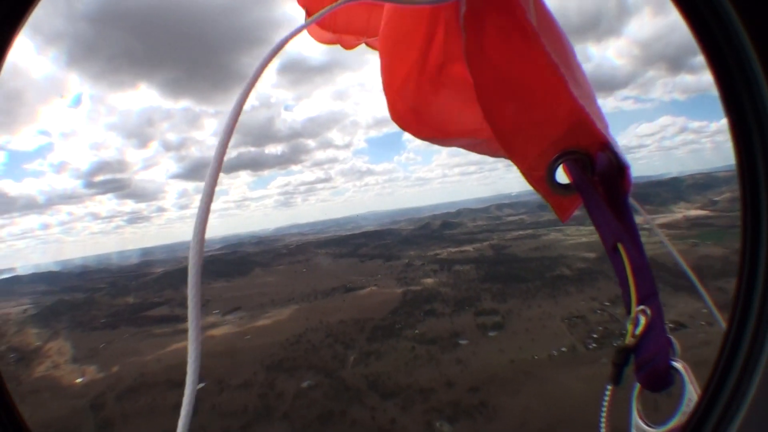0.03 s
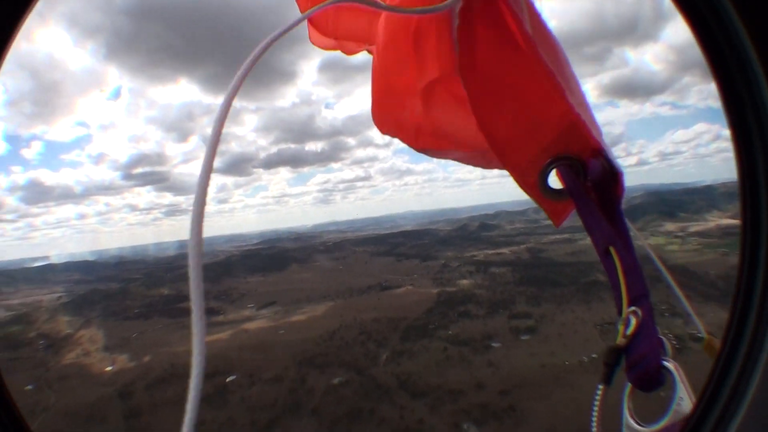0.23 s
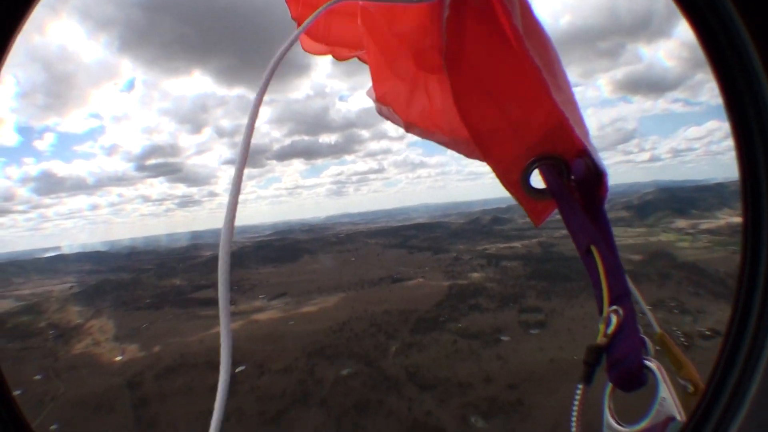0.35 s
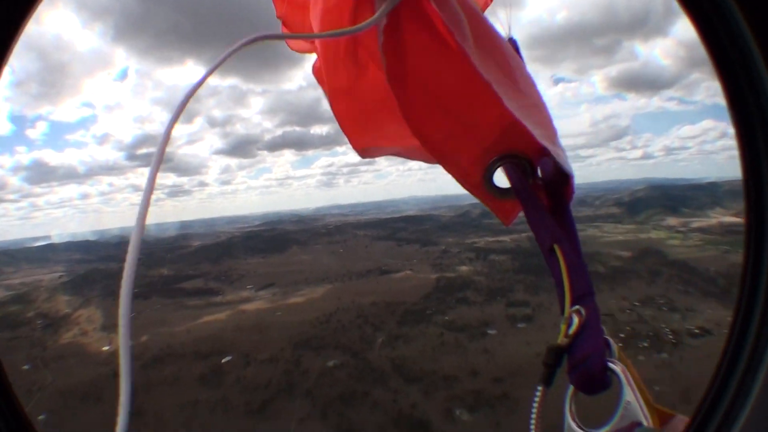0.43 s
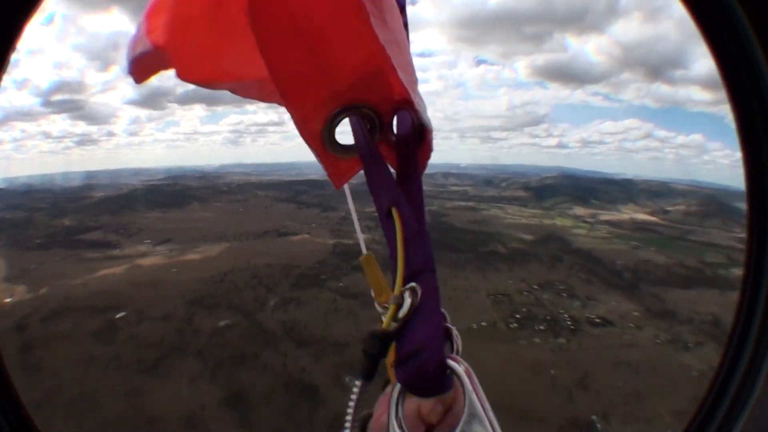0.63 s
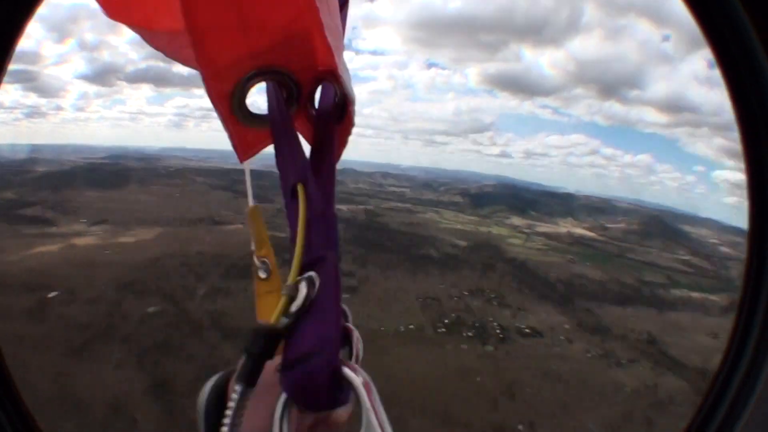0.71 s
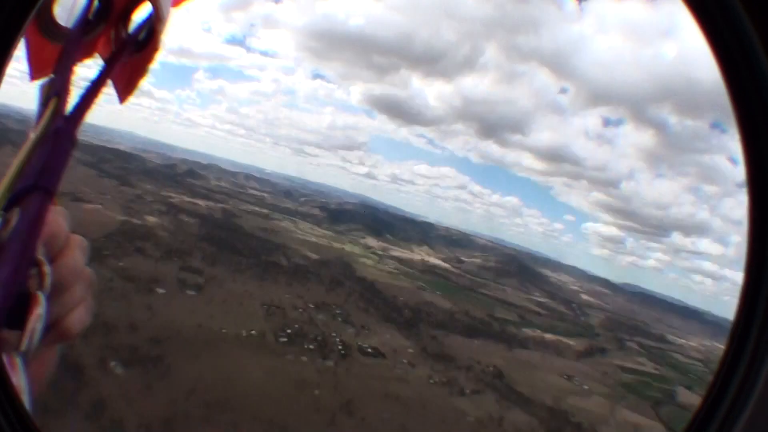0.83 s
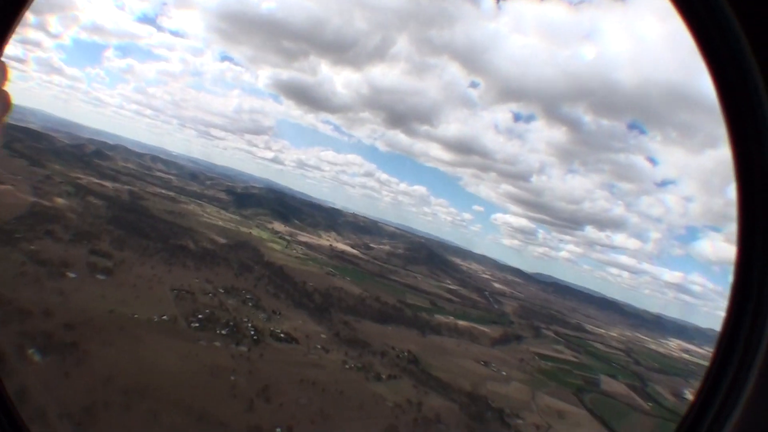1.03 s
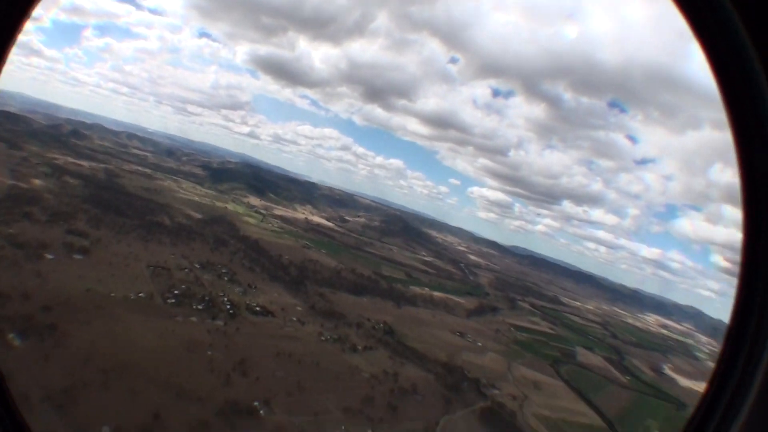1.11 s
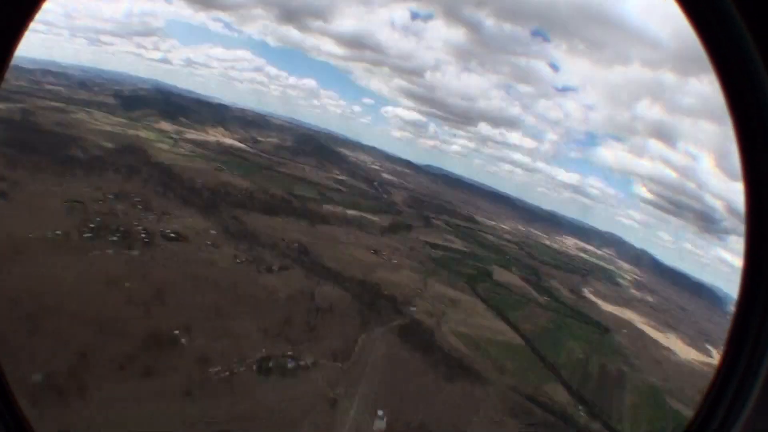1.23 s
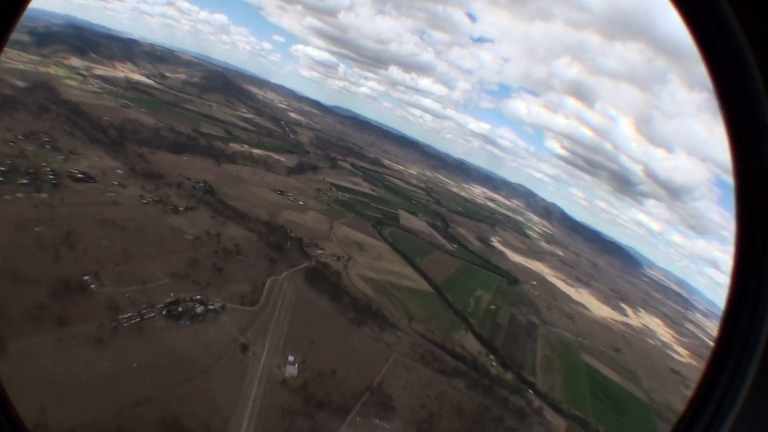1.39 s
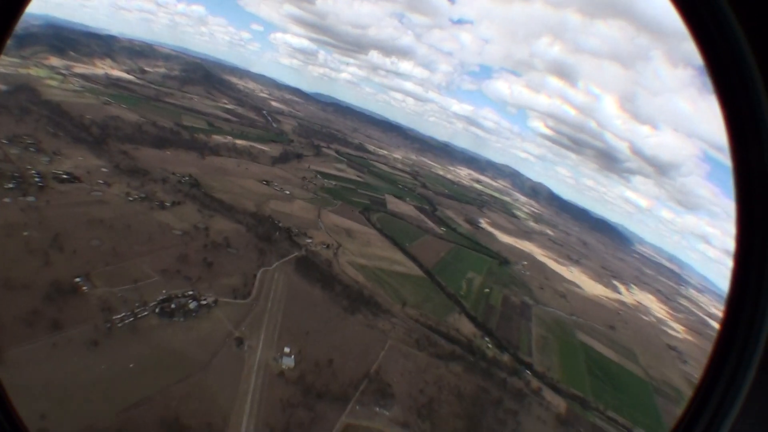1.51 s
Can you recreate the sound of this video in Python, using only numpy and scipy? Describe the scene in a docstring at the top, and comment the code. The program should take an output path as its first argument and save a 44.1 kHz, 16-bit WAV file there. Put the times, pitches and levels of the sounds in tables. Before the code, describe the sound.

Rushing wind buffets a microphone worn under an open parachute. Low rumble, fabric crackles and small line snaps come first, then a loud hissing blast that dies away with a whistle sinking in pitch.

```python
"""A blast of wind hits a camera worn by a skydiver under an open canopy (the parachute).
As the camera turns into the airstream, eddies (swirls of air) buffet its two microphone
openings, the ports. The blast brightens into a roar and hiss, then dies away, leaving a
falling, airy whistle of air passing over an edge. Behind it, air rumbles around the body,
the cloth rustles and pops, and the rigging lines snap."""
import sys
import numpy as np
from scipy import signal
from scipy.fft import rfft, irfft
from scipy.io import wavfile

SR = 44100
rng = np.random.default_rng(int(sys.argv[2]) if len(sys.argv) > 2 else 0)


def dump(signal):
    """Clip the signal to [-1, 1] and save it as 16-bit WAV at the path in sys.argv[1]."""
    limited = np.clip(np.atleast_2d(signal).T, -1, 1)
    pcm = np.round(limited * 32767).astype(np.int16)
    wavfile.write(sys.argv[1], SR, pcm)


N = 68355
TIME = np.arange(N) / SR
HZ = np.fft.rfftfreq(N, 1 / SR)

# How alike the two ports sound (1 is fully alike): frequency_hz, likeness
PORT_LIKENESS = [(100, 0.54), (280, 0.61), (550, 0.38), (1000, 0.25), (1700, 0.32), (3000, 0.18),
                 (6000, 0.78), (10000, 0.68), (14000, .99)]
# The same for the high hiss: frequency_hz, likeness
HISS_LIKENESS = [(3000, 1), (7000, .93), (11000, 0.84), (14000, 0.95)]
# How far the wave at the right port runs ahead of the left: frequency_hz, lead_radians
PORT_LEAD = [(300, -1), (600, 1.23), (1100, 3), (2100, 4), (3500, 2), (6000, 1.43), (10000, 0.68),
             (15000, -0.3)]


def amp(db):
    """Turns decibels into a multiplier."""
    return 10 ** (np.asarray(db) / 20)


def unit_power(x):
    """Scales a signal to an average power of one."""
    return x / np.sqrt(np.mean(x ** 2) + 1e-20)


def over_frequency(points, hz=HZ):
    """Joins a table's points along a logarithmic frequency axis."""
    frequency, value = np.transpose(points)
    return np.interp(np.log(hz + 1), np.log(frequency), value)


def over_time(points, column=1):
    """Joins the points of one table column along time."""
    rows = np.array(points)
    return np.interp(TIME, rows[:, 0], rows[:, column])


def wander(rate_hz):
    """Random drift, up to about the given rate."""
    noise = rfft(rng.standard_normal(N))
    return unit_power(irfft(noise * HZ / (HZ + 8) / (1 + (HZ / rate_hz) ** 4), N))


def churn(depth_db, rate_hz):
    """Loudness that swells and sinks as eddies pass."""
    return unit_power(amp(depth_db * np.clip(wander(rate_hz), -2, 2)))


def air_noise(spectrum, likeness, lead=0):
    """The noise of swirling air, partly shared by the two ports."""
    left, separate = rfft(rng.standard_normal((2, N)))
    right = (likeness * left + np.sqrt(1 - likeness ** 2) * separate) * np.exp(1j * lead)
    return unit_power(irfft(np.array([left, right]) * amp(over_frequency(spectrum)), N))


def colour(x, spectrum):
    """Shapes the tone with a filter that never rings early, so clicks stay sharp."""
    log_gain = np.log(amp(over_frequency(spectrum, abs(np.fft.fftfreq(2048, 1 / SR)))))
    taps = np.fft.ifft(np.exp(np.conj(signal.hilbert(log_gain)))).real
    return signal.fftconvolve(x, taps / np.linalg.norm(taps))[:N]


def pops(rows, spectrum, first_slip=1.1):
    """Each pop is one sharp slip and a burst of tiny ones that dies within milliseconds."""
    out = np.zeros(N)
    for start_s, level_db, decay_s in rows:
        age = (np.arange(N) - round(start_s * SR)) / SR
        tiny_slips = rng.standard_normal(N) * (age >= 0) * np.exp(-abs(age) / decay_s)
        burst = colour(tiny_slips + first_slip * (age == 0), spectrum)
        strength = np.sqrt(np.sum(burst ** 2) / (decay_s * SR))
        out += amp(level_db) * burst / strength / np.pi
    return out


def ringing(pitch_hz, width_hz):
    """A resonance stirred by swirling air; the real part of the result is the sound."""
    stir = rng.standard_normal(N) + 1j * rng.standard_normal(N)
    for _ in range(3):  # each pass through a filter width_hz wide narrows the band further
        stir = signal.lfilter([1], [1, -np.exp(-np.pi * width_hz / SR)], stir)
    return stir / np.std(stir) * np.exp(2j * np.pi * np.cumsum(pitch_hz) / SR)


def faint_air(level_db=-69):
    """A faint, steady, very high hiss of air."""
    # Its tone: frequency_hz, gain_db
    spectrum = [(3000, -22), (9000, -4), (13000, 20), (16000, -12)]
    return amp(level_db) * air_noise(spectrum, over_frequency(HISS_LIKENESS))


def rumble():
    """Air flowing around the body rumbles."""
    # Loudness of the flow: time_s, level_db
    levels = [(0, -33.5), (.18, -29.5), (.24, -28), (.35, -27.5), (.46, -27), (.55, -18.5), (.66, -30),
              (.77, -30), (1.07, -25.5), (1.22, -38.5), (1.55, -37)]
    # Its deep tone: frequency_hz, gain_db
    spectrum = [(15, -26), (35, -11.5), (70, -3), (130, -2.5), (230, -7.5), (400, -18), (900, -22.5),
                (2500, -52)]
    # How alike left and right are: frequency_hz, likeness
    likeness = [(50, 1), (250, 0.6)]
    return air_noise(spectrum, over_frequency(likeness)) * amp(over_time(levels))


def rustle(crackles_per_s=420, crackle_db=-7, spread_db=4.0):
    """The canopy cloth flutters with a fine crackle."""
    # Loudness of the cloth: time_s, level_db
    levels = [(0, -42.5), (.2, -43), (.235, -38.5), (.28, -42), (.37, -40.5), (.44, -37), (.51, -38),
              (.6, -30), (1.2, -46.5), (1.55, -41.5)]
    # Its tone: frequency_hz, gain_db
    spectrum = [(600, -6), (2000, -3), (2900, -1.5), (4500, -3), (7500, -9), (10000, -17), (13000, -29),
                (16000, -33)]
    # How alike left and right are: frequency_hz, likeness
    likeness = [(1500, 0.92), (3000, .93), (7000, 0.54), (11000, .92), (14000, .995)]
    sizes = amp(spread_db * np.minimum(rng.exponential(1, N), 3)) * rng.choice([-1, 1], N)
    clicks = sizes * (rng.random(N) < crackles_per_s / SR)
    crackle = unit_power(colour(clicks, spectrum))
    flutter = air_noise(spectrum, over_frequency(likeness)) * churn(depth_db=1.1, rate_hz=45)
    return (flutter + amp(crackle_db) * crackle) * amp(over_time(levels))


def creases():
    """Creases pop in the cloth."""
    # Each pop: start_s, level_db, decay_s
    events = [(.153, -28, .004), (.186, -36, 0.00092), (.2338, -20, .0012), (.2475, -32, 0.0017),
              (.3245, -18.5, 0.001), (.3785, -19.5, 0.0012), (.399, -25, 0.0067), (.4325, -20.5, .003),
              (.4555, -18, 0.0017), (.4605, -13, 0.0015), (.481, -24, 0.0062), (.4965, -34, .002),
              (.516, -18, 0.0011), (.5455, -18, .003), (.608, -11.5, 0.0027), (.621, -10.5, 0.0028)]
    # Their crisp tone: frequency_hz, gain_db
    spectrum = [(600, -7), (2000, -6), (2900, 6), (4500, 4), (7500, -2.5), (10000, -7), (13000, -14),
                (16000, -34)]
    return pops(events, spectrum)


def snaps():
    """The rigging lines snap sharply."""
    # Each snap: start_s, level_db, decay_s
    events = [(.0977, -15.5, 0.0011), (.1407, -17.5, 0.0024), (.1428, -16.5, 0.0012)]
    # Their bright tone: frequency_hz, gain_db
    spectrum = [(800, -36), (2300, -6), (3300, -4.5), (6500, 0), (10000, -5.5), (13500, -14), (16000, -29)]
    return pops(events, spectrum, first_slip=3)


def tick():
    """One thin, high tick near the end."""
    # The tick: start_s, level_db, decay_s
    events = [(1.4442, -33, .0006)]
    # Its tone: frequency_hz, gain_db
    spectrum = [(3000, -25), (9000, -6), (12000, -9), (14500, 0), (16000, -3)]
    return pops(events, spectrum)


def canopy(right_db=1.8):
    """The parachute's sounds overhead, a little louder on the right."""
    return (rustle() + creases() + snaps() + tick()) * amp([[-right_db / 2], [right_db / 2]])


def puffs():
    """Stray eddies swell and pass, pushing the two ports against each other."""
    # Each puff: middle_s, half_length_s, level_db
    events = [(0.022, 0.0079, -26.5), (0.234, .035, -31), (0.346, 0.011, -34), (0.426, 0.0089, -25),
              (0.588, 0.028, -16.5), (0.857, 0.0099, -21.5)]
    # Their hollow tone: frequency_hz, gain_db
    spectrum = [(70, -8), (180, 1), (400, 7.5), (600, 2.5), (1000, -8.5), (1700, -13), (4000, -54)]
    swells = sum(amp(db) * np.exp(-((TIME - middle) / half) ** 2 / 2) for middle, half, db in events)
    return air_noise(spectrum, likeness=0.83, lead=2.26) * swells


def boom():
    """Large eddies pump both ports together in a low throb."""
    # The boom of the camera housing: time_s, pitch_hz, level_db
    path = [(.48, 130, -63), (.56, 149.9, -27), (.615, 236.6, -17.5), (.655, 176.8, -17.5),
            (.72, 238.1, -17), (.77, 226, -35), (.85, 165.2, -25), (.94, 260.2, -26.5), (1.15, 230.1, -30),
            (1.25, 199, -40)]
    ring = ringing(over_time(path), width_hz=186)
    squashed = ring / (1 + abs(ring))
    return unit_power(squashed.real) * amp(over_time(path, column=2))


def whistle(waver=0.0077, airy_below_hz=70, lead_radians=1.81):
    """An airy band around a clear tone; the pitch sinks as the flow over the edge slows."""
    # The falling whistle: time_s, pitch_hz, level_db
    path = [(.6, 2352, -77), (.74, 2337, -28), (.8, 2250, -19), (.87, 2100, -36), (.98, 1930, -33),
            (1.0, 1946, -19.5), (1.1, 1802, -20.5), (1.155, 1646, -20), (1.21, 1788, -38),
            (1.3, 1771, -31.5), (1.375, 1550, -29), (1.465, 1430, -31), (1.49, 1282, -28),
            (1.55, 1263, -27.5)]
    # The clear tone compared with the airy band: time_s, strength
    clear_strength = [(.8, 0.56), (1.05, 0.83), (1.25, 0.59), (1.38, 1.4), (1.55, 1.8)]
    pitch_hz = over_time(path) * (1 + waver * wander(rate_hz=37.8))
    clear = ringing(pitch_hz, width_hz=90.25)
    clear /= abs(clear) + 0.16  # evens out the loudness, as the tone keeps itself going
    airy = ringing(pitch_hz - airy_below_hz, width_hz=600)
    tone = airy + over_time(clear_strength) * clear
    both_ports = np.array([tone, tone * np.exp(1j * lead_radians)]).real
    return unit_power(both_ports) * amp(over_time(path, column=2))


def hiss():
    """The finest eddies hiss."""
    # Loudness of the hiss: time_s, level_db
    levels = [(.5, -72), (.595, -48), (.61, -26.5), (.67, -28), (.74, -26.5), (.82, -27), (.96, -32.5),
              (1.16, -34), (1.23, -37.5), (1.36, -43), (1.55, -49)]
    # Its bright tone: frequency_hz, gain_db
    spectrum = [(1500, -26), (3500, -6.5), (5500, 1.5), (8000, -4), (10000, -9.5), (13000, -19.5),
                (16000, -26)]
    noise = air_noise(spectrum, over_frequency(HISS_LIKENESS), over_frequency(PORT_LEAD))
    return noise * amp(over_time(levels)) * churn(depth_db=1.7, rate_hz=920)


def buffet():
    """The airstream pounds the ports as it first meets them."""
    # Loudness of the pounding: time_s, level_db
    levels = [(0, -37), (.08, -36.5), (.17, -38), (.23, -32), (.3, -40.5), (.44, -30.5), (.51, -40),
              (.56, -24), (.62, -12.5), (.71, -18.5), (.78, -20), (.95, -19.5), (1.14, -33), (1.25, -37),
              (1.55, -45)]
    # Its heavy tone: frequency_hz, gain_db
    spectrum = [(40, -38), (110, -14), (190, -4.5), (270, -1), (400, -4), (700, -7), (1200, -8),
                (2200, -23.5), (5000, -58)]
    noise = air_noise(spectrum, over_frequency(PORT_LIKENESS), over_frequency(PORT_LEAD))
    return noise * amp(over_time(levels)) * churn(depth_db=1.5, rate_hz=54)


def roar(turn_middle_s=0.94, turn_length_s=0.13):
    """Air scrapes over the ports; once the camera has turned, eddies cross the other way."""
    # Loudness of the roar: time_s, level_db
    levels = [(0, -62), (.52, -44), (.57, -22.5), (.63, -20.5), (.73, -16.5), (.79, -13), (.88, -15.5),
              (1, -17.5), (1.15, -16), (1.21, -22.5), (1.33, -29.5), (1.44, -35.5), (1.55, -36)]
    # Its broad tone: frequency_hz, gain_db
    spectrum = [(80, -28), (300, -7.5), (700, -1.5), (1200, -3), (2100, -6.5), (3000, -11.5), (5000, -18),
                (8000, -39), (15000, -56)]
    # The right port's lead after the turn: frequency_hz, lead_radians
    turned_lead = [(300, -0.7), (600, -1), (1100, -3.5), (2100, -3), (3500, -5), (6000, -7), (10000, -4),
                   (15000, -8)]
    likeness = over_frequency(PORT_LIKENESS)
    before = air_noise(spectrum, likeness, over_frequency(PORT_LEAD))
    after = air_noise(spectrum, likeness, over_frequency(turned_lead))
    turn = np.clip((TIME - turn_middle_s) / turn_length_s + 0.5, 0, 1)
    return (np.sqrt(1 - turn) * before + np.sqrt(turn) * after) * amp(over_time(levels))


def scene():
    """Adds wind and canopy; the same eddies shake the roar and the hiss together."""
    eddies = churn(depth_db=1.0, rate_hz=250)
    wind = rumble() + buffet() + (roar() + hiss()) * eddies
    return wind + faint_air() + puffs() + boom() + whistle() + canopy()


def record(dry, cutoff_hz=15850):
    """Flattens peaks beyond full scale, then removes the highest treble."""
    low_pass = signal.firwin(511, cutoff_hz, window=("kaiser", 9), fs=SR)
    return signal.oaconvolve(np.clip(dry, -1, 1), low_pass[None], "same")


dry = scene()
out = record(dry)
dump(out)
```